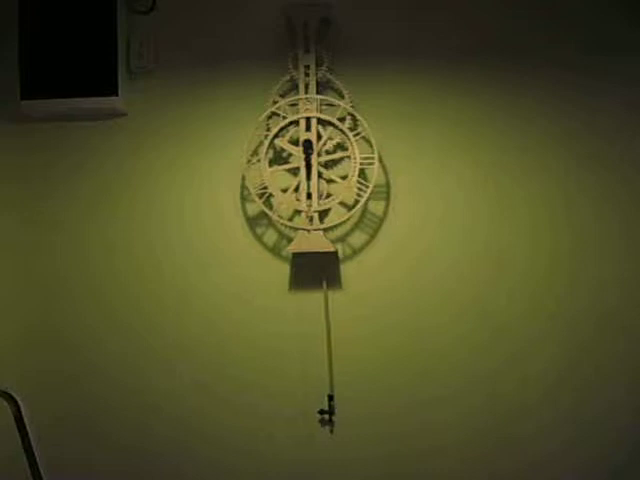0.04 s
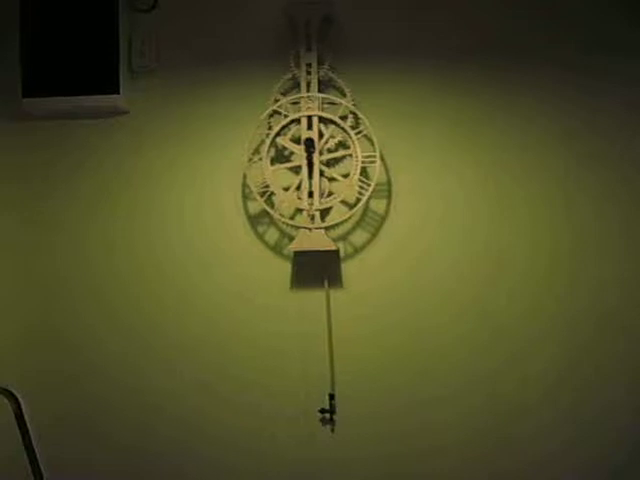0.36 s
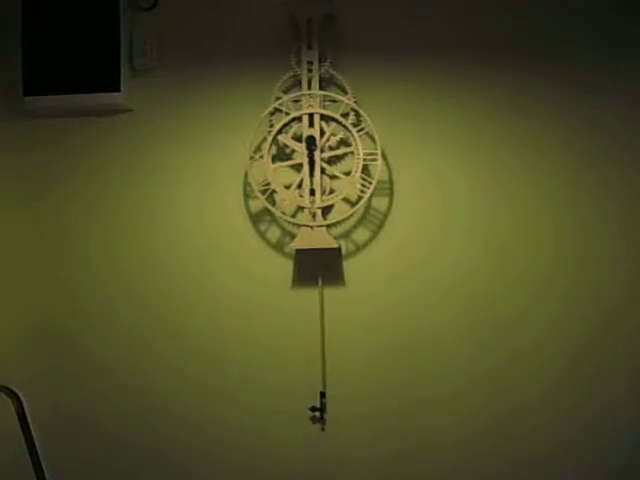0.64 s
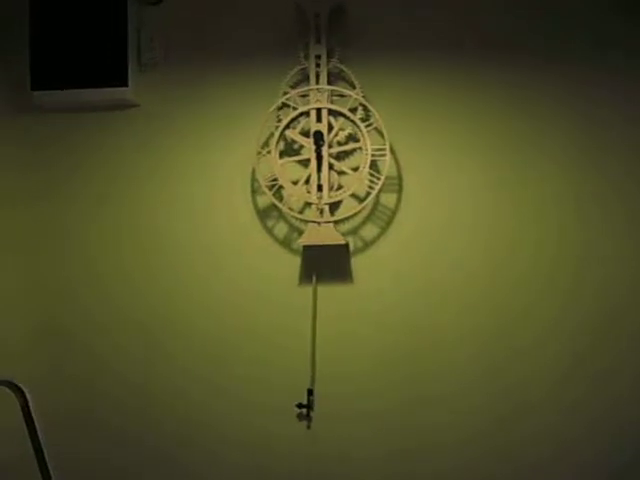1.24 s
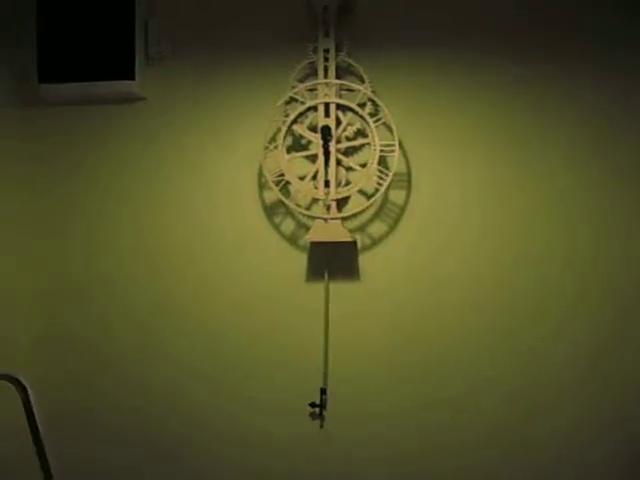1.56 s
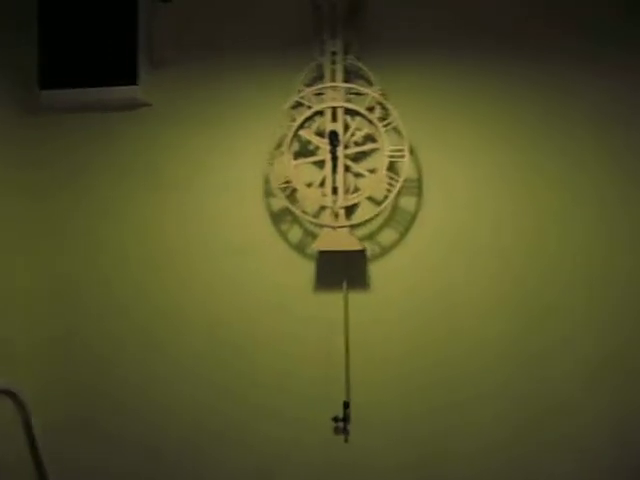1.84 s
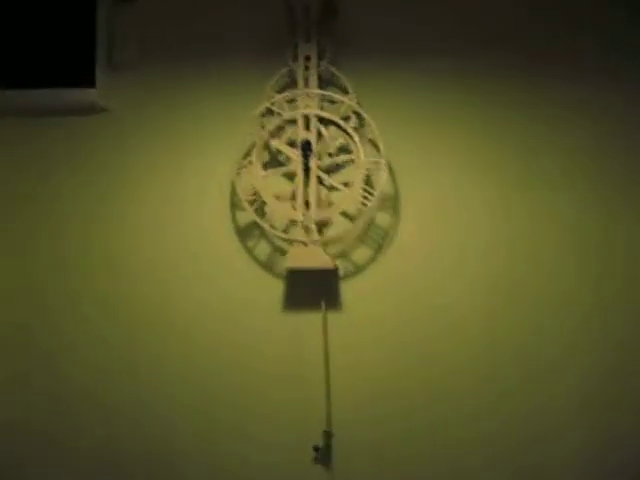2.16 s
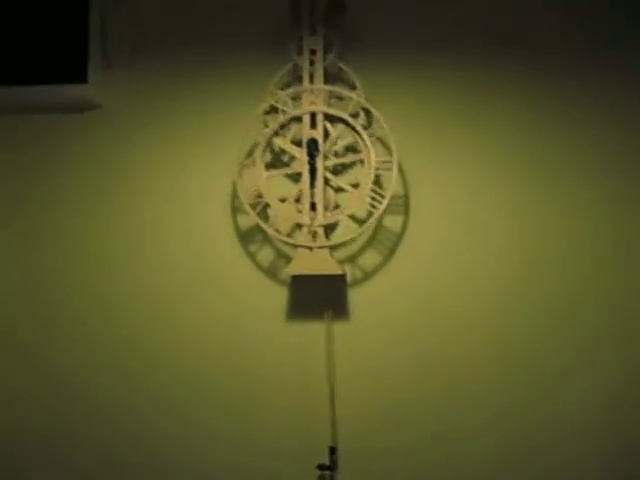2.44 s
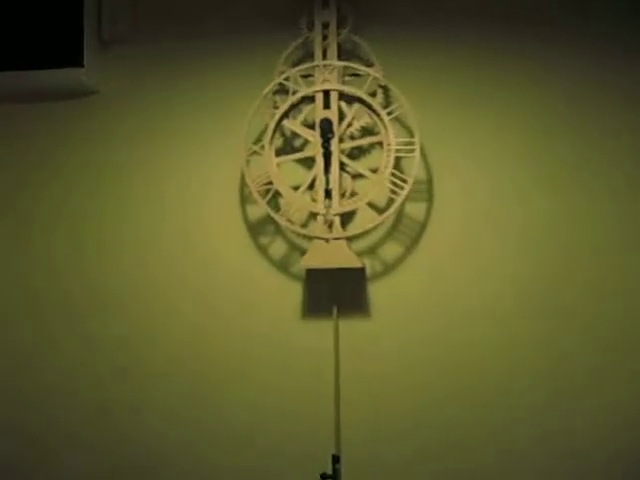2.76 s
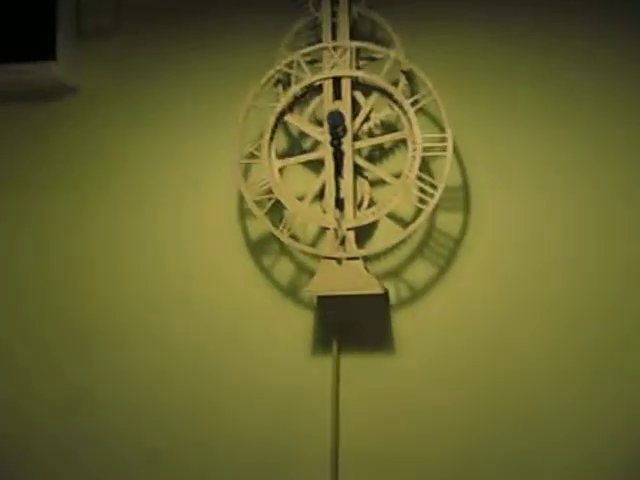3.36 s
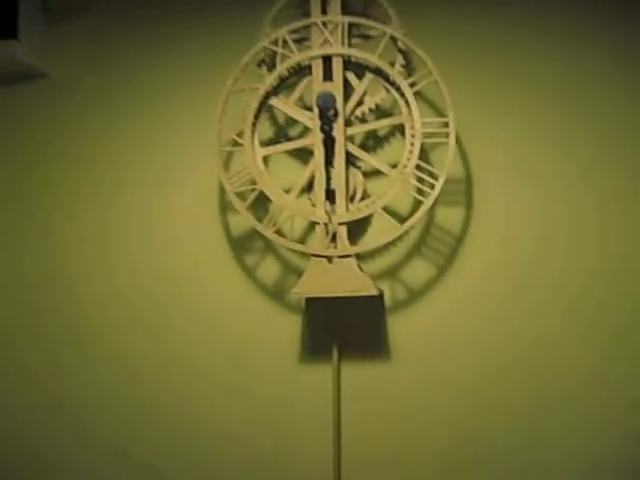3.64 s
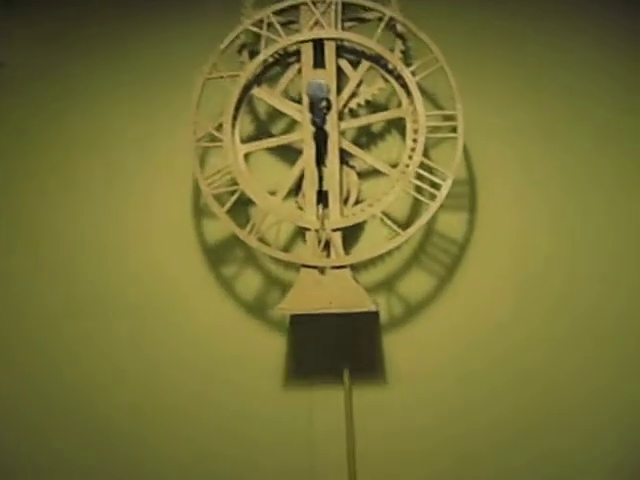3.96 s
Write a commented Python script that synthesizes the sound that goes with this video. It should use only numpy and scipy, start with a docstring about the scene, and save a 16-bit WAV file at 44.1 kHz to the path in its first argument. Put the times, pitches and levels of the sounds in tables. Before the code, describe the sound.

A wooden wall clock ticks softly about once a second over faint hum and hiss.

```python
"""A wooden clock in a bare room

A wooden gear clock on the wall ticks about once a second, heard from a few metres. Its pallets (the
catches that stop and release a toothed wheel) land with soft knocks and now and then a hard clack.
The gears take up their slack in faint taps. A machine hums steadily in the quiet background,
and the microphone hisses and misses the high treble."""
import sys
import numpy as np
from scipy import signal
from scipy.fft import rfft, irfft, next_fast_len
from scipy.io import wavfile
from scipy.ndimage import map_coordinates

SR = 44100
rng = np.random.default_rng(int(sys.argv[2]) if len(sys.argv) > 2 else 0)


def file_out(sig):
    """Save sig as 16-bit WAV at sys.argv[1]."""
    # one column per channel
    cols = np.atleast_2d(sig).T
    # limit, then scale
    lim = np.clip(cols, -1, 1)
    pcm = np.round(lim * 32767).astype(np.int16)
    wavfile.write(sys.argv[1], SR, pcm)


N = 176400


def amp(db):
    """Turn decibels into a factor to multiply by."""
    return 10 ** (np.asarray(db) / 20)


def along(points, hz):
    """Read a curve of (frequency, value) points at hz, on a scale of octaves."""
    frequencies, values = np.transpose(points)
    return np.interp(np.log(hz + 1), np.log(frequencies + 1), values)


def wobble(rate):
    """A smooth curve through `rate` random values a second."""
    return map_coordinates(rng.standard_normal(int(N * rate / SR) + 4), [np.arange(N) * rate / SR])


def filtered(x, gain):
    """Make each frequency of x louder or softer by the factor gain(hz)."""
    size = 2 * next_fast_len(len(x))
    hz = np.fft.rfftfreq(size, 1 / SR)
    cepstrum = irfft(np.log(np.maximum(gain(hz), 1e-6)))
    # folding this onto its first half makes the filter ring only after a sound, never before
    cepstrum[1:size // 2] *= 2
    cepstrum[size // 2 + 1:] = 0
    return irfft(rfft(x, size) * np.exp(rfft(cepstrum)))[:len(x)]


def background_hiss():
    """Room noise and microphone hiss make an even rush, strongest in the bass."""
    # tone of the noise (frequency [Hz], relative level [dB])
    colour = [(25, 1.5), (50, 8.5), (100, 1), (160, 1.5), (330, -2.5), (500, -2.5), (750, -5), (1100, -6.5),
              (1500, -8.5), (2500, -9.5), (3500, -10.5), (4000, -14), (4300, -23.5)]
    noise = filtered(rng.standard_normal(N), lambda hz: amp(along(colour, hz)))
    return amp(-49.5) * noise / np.sqrt(np.mean(noise ** 2))


def machine_hum():
    """A machine holds steady tones that waver a little in level and pitch."""
    # the machine's tones (frequency [Hz], average level [dB])
    tones = [(460, -69.5), (492.3, -58.5), (524.8, -71.5), (1055.2, -61.5), (1080, -67), (1443, -73),
             (1507, -71.5), (1970, -69.5), (2137, -68.5), (2955, -72)]
    waver_db, drift_hz = 0.6, 0.5
    out = np.zeros(N)
    for hz, db in tones:
        peak = np.sqrt(2) * amp(db + waver_db * wobble(8.8))
        cycles = rng.random() + np.cumsum(hz + drift_hz * wobble(8)) / SR
        out += peak * np.sin(2 * np.pi * cycles)
    return out


def wood_contact():
    """Wood meets wood: a sharp click, a brief crackle of the surfaces and a short ring."""
    # ringing notes of wheels and frame (frequency [Hz], relative level [dB], time to fade 60 dB [s])
    notes = [(563, -7, 0.048), (850, -10, 0.022), (1036, -0.5, 0.12), (1528, -4, 0.034), (1710, -9, 0.011),
             (1870, -7, .04), (2630, 3.5, 0.01), (2770, -7, 0.033), (3200, -7, 0.033), (3330, -5.5, 0.02),
             (3520, -13, 0.017), (3600, -4.5, .05)]
    ring_db, crackle_db, crackle_fade_s = -17.5, -13, 0.027
    t = np.arange(SR // 10) / SR
    click = t == 0
    crackle = rng.standard_normal(len(t)) * amp(-60 * t / crackle_fade_s)
    crackle *= amp(crackle_db) / np.linalg.norm(crackle)
    ring = np.zeros(len(t))
    for hz, db, fade_s in notes:
        level = amp(db + rng.normal(0, 2.2) - 60 * t / fade_s)
        ring += level * np.sin(2 * np.pi * (hz * t + rng.random()))
    ring *= amp(ring_db) / np.linalg.norm(ring)
    return click + crackle + ring


def room_echo(echo_db):
    """A click arrives directly, scatters off frame and wall, and lingers as the room's echo."""
    # how long the room rings (frequency [Hz], time to fade 60 dB [s])
    fade_times = [(150, 1), (400, 0.67), (1040, 0.63), (2000, 0.48), (3500, 0.57)]
    direct_db, scatter_fade_s, rise_s = -13.5, 0.1, 0.002
    t = np.arange(SR) / SR
    rise = 1 - np.exp(-t / rise_s)
    hz, times, bands = signal.stft(rng.standard_normal(SR), SR, nperseg=256)
    bands *= amp(-60 * times / along(fade_times, hz)[:, None])
    echo = signal.istft(bands, SR, nperseg=256)[1][:SR] * rise
    echo *= amp(echo_db) / np.linalg.norm(echo)
    scatter = rng.standard_normal(SR) * rise * amp(-60 * t / scatter_fade_s)
    scatter *= amp(-4.5 + echo_db / 2) / np.linalg.norm(scatter)
    return amp(direct_db) * (t == 0) + scatter + echo


def knocks(rows):
    """Each knock sounds through the room, boosted at the resonances (own notes) of the part it hits."""
    # tone of a knock on the wooden frame (frequency [Hz], boost [dB])
    wood = [(40, -16), (100, -1), (190, 4), (320, 0), (500, 1.5), (1000, -3.5), (1250, -3.5), (1800, -3.5),
            (2250, -4), (3000, -6), (3750, -6), (4300, -17)]
    bass_hz, middle_hz, treble_hz, resonance_octaves = 354, 1000, 3250, 0.09
    out = np.zeros(N + 2 * SR)
    for start_s, db, bass_db, treble_db, echo_db, *resonances in rows:
        tilt = [(bass_hz, bass_db), (middle_hz, 0), (treble_hz, treble_db)]

        def colour(hz):
            total_db = along(wood, hz) + along(tilt, hz)
            for note_hz, boost_db in zip(resonances[::2], resonances[1::2]):
                octaves_away = np.log2((hz + 1) / note_hz)
                total_db += boost_db / (1 + (octaves_away / resonance_octaves) ** 2)
            return amp(total_db)

        blow = signal.fftconvolve(wood_contact(), room_echo(echo_db))[:SR]
        out[round(start_s * SR):][:SR] += np.sqrt(SR / 2) * amp(db) * filtered(blow, colour)
    return out[:N]


def gear_taps():
    """The gears tap faintly as they take up their slack."""
    # gear teeth meeting (time [s], relative level [dB], bass [dB], treble [dB], echo [dB],
    # resonance [Hz], its boost [dB])
    taps = [(0.714, -46.5, -1, -6.5, -17, 1510, 18), (0.966, -47, 4, -1.5, -8.5, 3640, 12),
            (0.989, -45.5, 4.5, -5, -9.5, 3780, 12), (1.197, -53, -6.5, -5, -10, 1410, 14.5),
            (1.425, -63, -3.5, 8.5, -6, 3970, 11), (1.695, -51, -5.5, -2, -4, 1740, 6),
            (1.898, -49.5, 1.5, -3.5, 3, 1626, 4), (2.022, -44, 1.5, -7.5, -4, 1604, 13),
            (2.671, -44, -4, -10.5, -10, 1350, 11), (2.771, -48.5, 4, -5, -9.5, 452, 13),
            (2.81, -46, 4, -11, -3.5, 442, 7), (2.927, -45.5, 3.5, -2.5, -8.5, 400, 7),
            (3.052, -45, 2.5, -7.5, -2, 700, 9.5), (3.724, -50.5, 7.5, -1, -2, 1580, 12.5),
            (3.78, -50, -11.5, -5, -6, 1540, 7)]
    return knocks(taps)


def clock_ticks():
    """The pallets drop onto the toothed escape wheel; three quick hits blend into a hard clack."""
    # pallet drops (time [s], relative level [dB], bass [dB], treble [dB], echo [dB],
    # then for the low, middle and high resonance: frequency [Hz], boost [dB])
    drops = [(0.932, -40.5, -0.5, -2, -2.5, 490, 6.8, 1000, 9.2, 1890, 2.8),
             (1.951, -40, -2.5, -3, 0.5, 850, 4, 1430, 9.7, 1940, 6.1),
             (2.843, -38.5, -6.5, 3.5, -2, 574, 12, 1330, 6.3, 2540, 3.6),
             (2.849, -34.5, -7.5, 6.5, -1, 660, 3, 1760, 4, 3210, 5.4),
             (2.860, -38.5, -6.5, 4.5, -1, 579, 7, 2750, 3, 3490, 6),
             (3.027, -39.5, -0.5, -5.5, -0.5, 570, 3.3, 867, 6.2, 1860, 11),
             (3.977, -36.5, -2, -2, 0, 900, 3, 1400, 4, 1950, 9), ]
    return knocks(drops)


def scene():
    """The clock over the room's hiss and hum, in one channel."""
    return (background_hiss() + machine_hum() + clock_ticks() + gear_taps())[None]


def record(dry):
    """The recorder cuts off the high treble and shifts the whole wave up by a steady, silent amount."""
    rolloff_hz, top_hz, offset = 4204, 4797, 0.466
    size = next_fast_len(N + SR)
    hz = np.fft.rfftfreq(size, 1 / SR)
    treble_cut = (hz < top_hz) / np.sqrt(1 + (hz / rolloff_hz) ** 70)
    return offset + irfft(rfft(dry, size) * treble_cut, size)[:, :N]


dry = scene()
out = record(dry)
file_out(out)
```